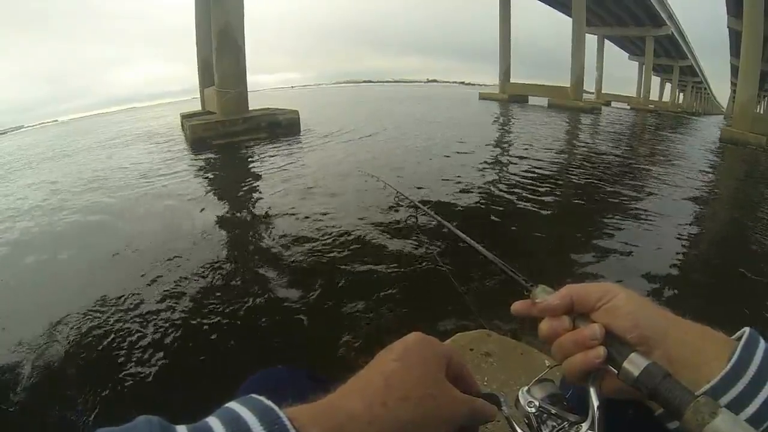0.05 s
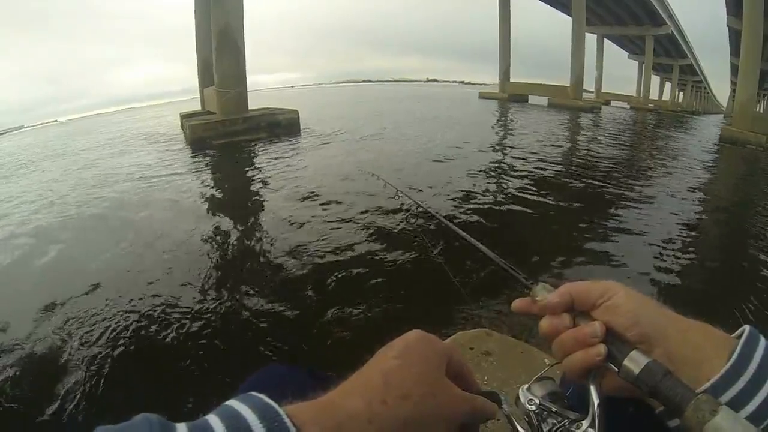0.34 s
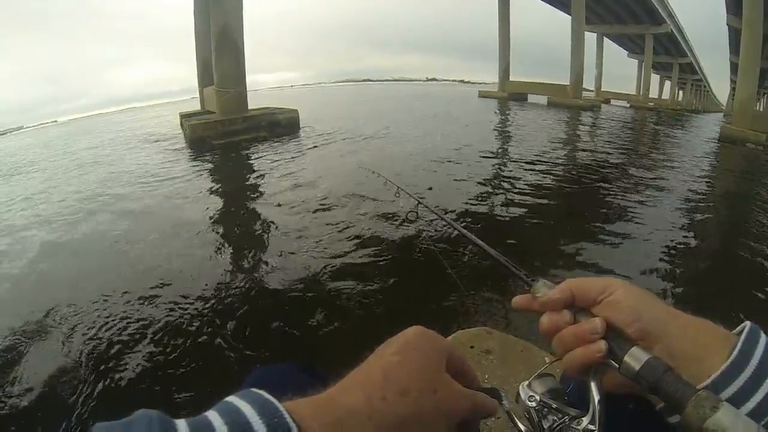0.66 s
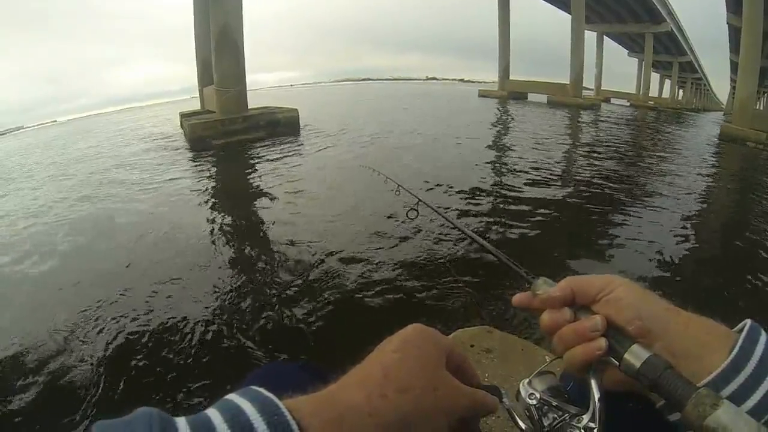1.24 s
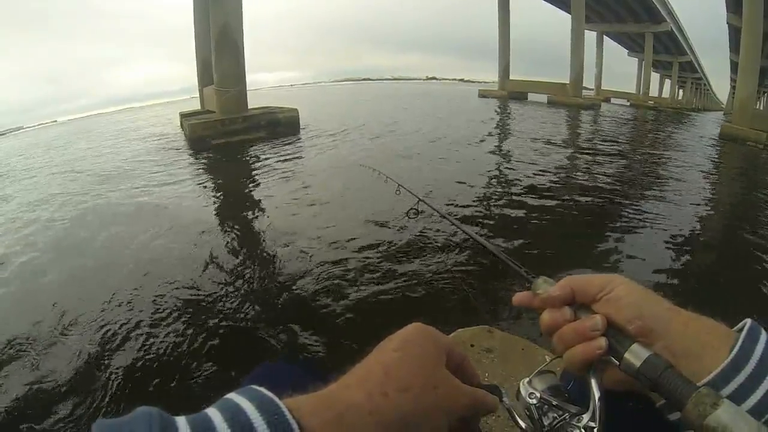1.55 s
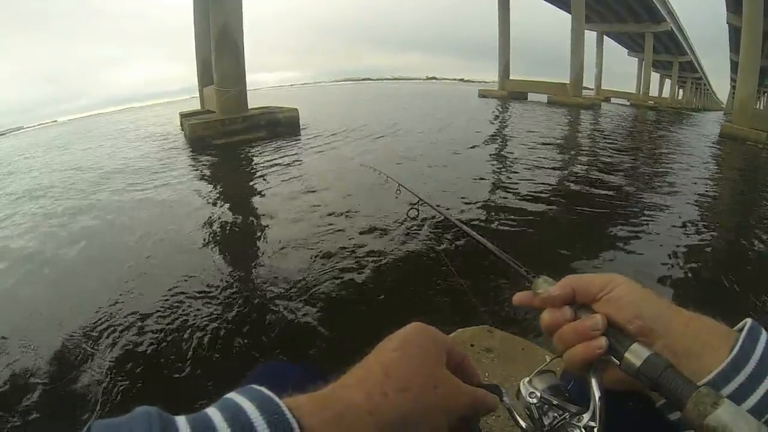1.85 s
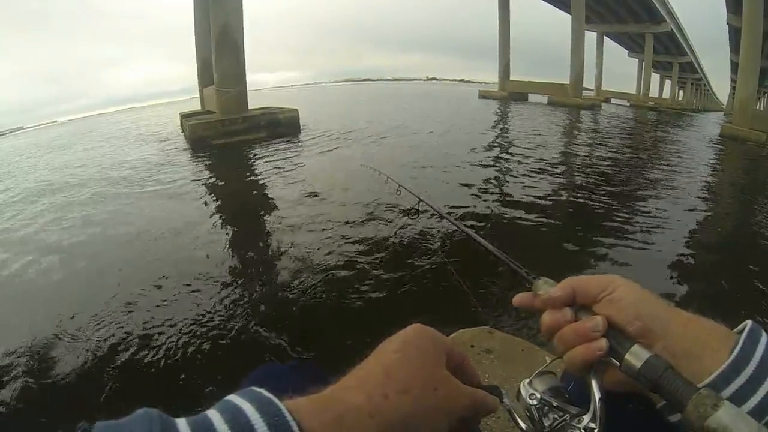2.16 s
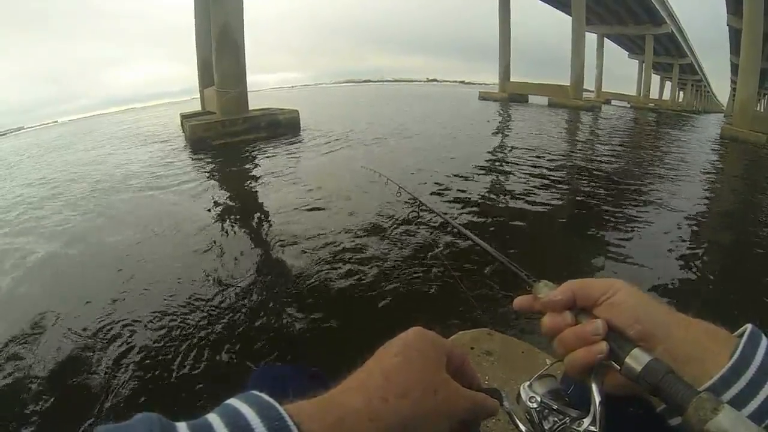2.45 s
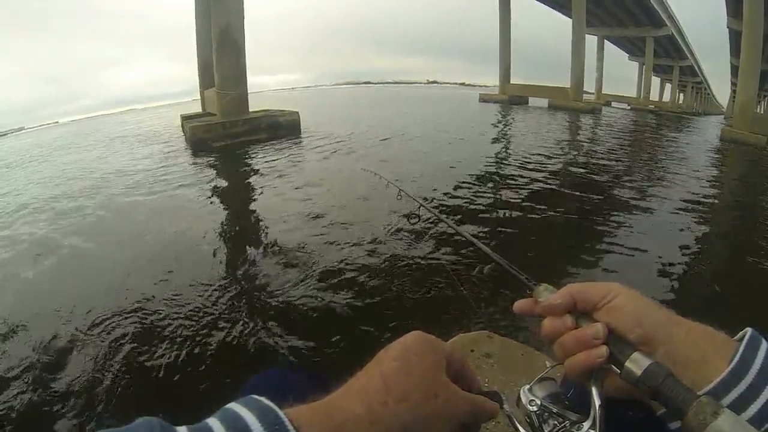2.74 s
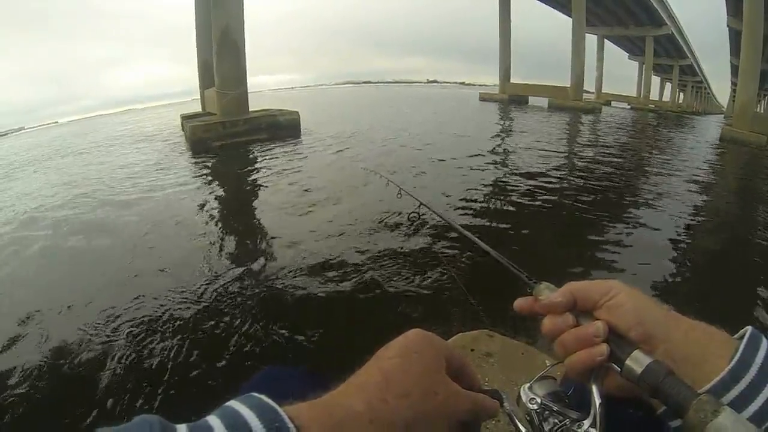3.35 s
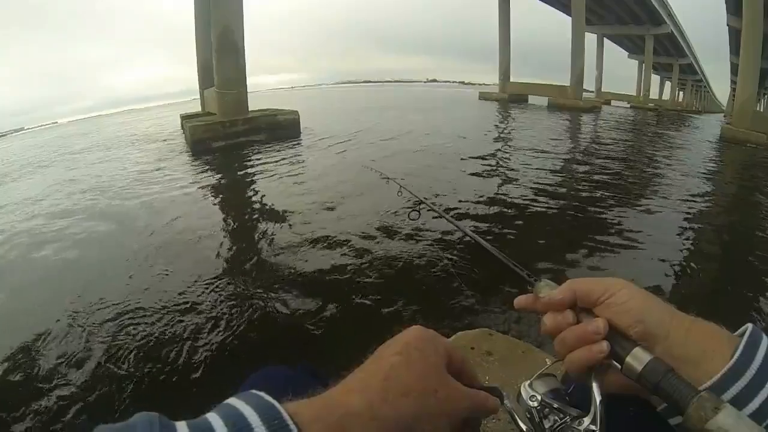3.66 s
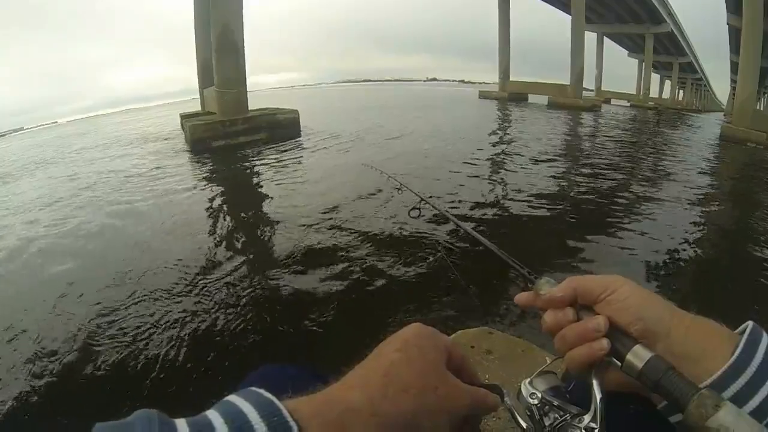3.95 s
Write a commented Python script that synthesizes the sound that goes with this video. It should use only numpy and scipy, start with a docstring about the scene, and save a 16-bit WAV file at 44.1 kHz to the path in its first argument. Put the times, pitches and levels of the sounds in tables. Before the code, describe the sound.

Steady traffic roar from a high bridge over water, with light wind rumble.

```python
"""Tyre roar and a receding heavy vehicle's drone, heard from open water under a high road bridge.
Wheels shake the deck overhead; light wind rumbles on the microphone.
Ripples hiss and wash softly, tiny bubbles burst, and an angler's reel ticks a few times.
The electronics of a body-worn camera add a very faint pulsing whine."""
import sys
import numpy as np
from scipy import signal
from scipy.io import wavfile

SR = 44100
rng = np.random.default_rng(int(sys.argv[2]) if len(sys.argv) > 2 else 0)


def int16_out(signal):
    """Quantize to a 16-bit WAV file."""
    q = np.round(np.clip(np.atleast_2d(signal).T, -1, 1) * 32767)
    wavfile.write(sys.argv[1], SR, q.astype(np.int16))


N = 176400
TIME_S = np.arange(N) / SR
CUTOFF_HZ = 14200


def from_db(db):
    """Decibels to gain."""
    return 10 ** (np.asarray(db) / 20)


def unit_rms(x):
    """Scale to rms 1."""
    return x / np.sqrt(np.mean(x ** 2) + 1e-20)


def in_time(rows):
    """Interpolate (time [s], values...) rows to every sample."""
    times_s, *columns = np.transpose(rows)
    return [np.interp(TIME_S, times_s, column) for column in columns]


def drift(rate_hz):
    """Smooth random wander, rms about 1."""
    hop, settle = 40, 2000
    pole = np.exp(-2 * np.pi * rate_hz * hop / SR)
    white = rng.standard_normal(N // hop + settle + 2)
    slow = signal.lfilter([1], [1, -2 * pole, pole * pole], white)[settle:]
    return np.interp(np.arange(N) / hop, np.arange(len(slow)), unit_rms(slow))


def butter(x, hz, kind, order=2):
    """Butterworth filter."""
    return signal.sosfilt(signal.butter(order, hz, kind, fs=SR, output="sos"), x)


def resonance(x, hz, width_hz):
    """Two-pole band-pass."""
    r = np.exp(-np.pi * width_hz / SR)
    return signal.lfilter([1, 0, -1], [1, -2 * r * np.cos(2 * np.pi * hz / SR), r * r], x)


def ring(clicks, hz, t60_s):
    """Damped mode: a unit click starts a sine of height 1."""
    r = from_db(-60 / (t60_s * SR))
    w = 2 * np.pi * hz / SR
    return signal.lfilter([0, np.sin(w)], [1, -2 * r * np.cos(w), r * r], clicks + 1e-18)


def banded_noise(spectrum, low_hz, high_hz, flicker_db, bands):
    """Noise in log-spaced bands, each flickering on its own; rms 1."""
    hz, db = np.transpose(spectrum)
    edges_hz = np.geomspace(low_hz, high_hz, bands + 1)
    white = rng.standard_normal((2, N + SR))
    out = 0
    for k, band_hz in enumerate(zip(edges_hz, edges_hz[1:])):
        level_db = np.interp(np.mean(np.log(band_hz)), np.log(hz), db) + flicker_db * drift(rate_hz=7)
        out += from_db(level_db) * butter(white[k % 2], band_hz, "band", order=3)[SR:]
    return unit_rms(out)


def pops(per_s, spread_db, max_db):
    """Impulses of random time, size and sign."""
    size_db = np.minimum(rng.exponential(spread_db, N), max_db)
    signs = rng.choice([-1, 1], N)
    return from_db(size_db) * signs * (rng.random(N) < per_s / SR)


def whine():
    """Thin electronic tones, gated in slightly uneven bursts."""
    # tones: (frequency [Hz], rms while on [dB])
    tones = [(6440, -75.5), (12890, -83.5)]
    pulse_hz, duty, jitter_cycles, wander_hz = 48.2, .45, .09, 35
    cycles = pulse_hz * TIME_S + jitter_cycles * drift(rate_hz=20)
    gate = butter(1.0 * (cycles % 1 < duty), hz=440, kind="low")
    out = 0
    for hz, db in tones:
        phase = 2 * np.pi * np.cumsum(hz + wander_hz * drift(rate_hz=40)) / SR
        out += np.sqrt(2) * from_db(db) * np.sin(phase)
    return gate * out


def crackle():
    """Tiny bubbles burst close by."""
    bursts = pops(per_s=110, spread_db=3, max_db=9)
    return from_db(-87) * unit_rms(butter(bursts + 1e-18, hz=(5000, 12000), kind="band"))


def ripples():
    """Countless far ripples merge into a faint, gently swelling hiss."""
    # hiss spectrum: (frequency [Hz], relative density [dB])
    spectrum = [(2600, -2), (2950, -2), (3500, 0), (3950, -5.5), (4550, -12.5), (5400, -15), (7000, -24),
                (8000, -18), (8700, -26.5), (9500, -21.5), (11000, -29.5), (12300, -27), (14000, -34)]
    # hiss swell: (time [s], gain [dB])
    swell = [(0, 0), (.85, -0.5), (1.3, 0.8), (2.1, 1), (2.55, 0.5), (3.0, -1.4), (3.4, 0.5), (3.7, -1.5),
             (4, .5)]
    swell_db, = in_time(swell)
    hiss = banded_noise(spectrum, low_hz=2647, high_hz=CUTOFF_HZ, flicker_db=.8, bands=14)
    return from_db(-61.5 + swell_db) * hiss


def washes():
    """Each wash is a swell of tiny droplets fizzing around one pitch."""
    # Gaussian swells: (peak time [s], sigma [s], peak rms [dB], centre [Hz])
    swells = [(.41, .042, -64, 3800), (.5, .06, -67.5, 5000), (1.308, .04, -54, 2450),
              (1.388, .048, -65, 4400), (2.25, .2, -71, 5000), (2.575, .018, -69, 5700),
              (3.92, .06, -67, 5700)]
    out = 0
    for peak_s, sigma_s, db, hz in swells:
        droplets = pops(per_s=2500, spread_db=3.6, max_db=14.4)
        fizz = butter(resonance(droplets, hz, width_hz=.45 * hz), 1.5 * hz, "low")
        envelope = np.exp(-.5 * ((TIME_S - peak_s) / sigma_s) ** 2)
        out += from_db(db) * envelope * unit_rms(fizz)
    return out


def plip():
    """One small bubble rings briefly at the waterline."""
    peak_s, sigma_s, pitch_hz = 3.155, .008, 2000
    offset_s = TIME_S - peak_s
    envelope = np.exp(-.5 * (offset_s / sigma_s) ** 2)
    return from_db(-44) * envelope * np.sin(2 * np.pi * pitch_hz * offset_s)


def reel():
    """Reel and line tick: dry cracks, the harder ones ringing the reel's modes."""
    # ticks: (time [s], strength [dB], crack low edge [Hz], crack high edge [Hz], ring gain [dB])
    ticks = [(1.081, -49, 3200, 5800, -14), (1.381, -48, 4800, 8000, -10), (1.387, -47, 3600, 7000, -10),
             (1.396, -49, 3400, 6000, -14), (2.291, -50, 4000, 6400, -10),
             (2.5205, -50.5, 7000, 10600, -20), (2.8717, -46, 9600, 11200, -5),
             (2.875, -51, 4800, 7400, -10), (2.8815, -55, 9800, 11400, -15), (2.9295, -43, 3700, 11000, 0),
             (2.9335, -49, 4200, 8400, -6), (2.9465, -52, 7700, 8700, -10), (3.859, -56, 8500, 12500, -15),
             (3.885, -54, 4800, 11500, -12)]
    # reel modes: (frequency [Hz], gain [dB], t60 [s])
    modes = [(4240, -5, .02), (4800, -13, .008), (6280, -10, .02), (7800, -19, .01), (10350, -11, .008),
             (10950, -15, .007)]
    scuff_decay_s, scuff_gain_db = .0015, -2.5
    knocks, cracks = np.zeros(N), 0
    for start_s, db, low_hz, high_hz, ring_db in ticks:
        age_s = TIME_S - start_s
        envelope = (age_s >= 0) * np.exp(-np.minimum(np.abs(age_s) / scuff_decay_s, 20))
        scuff = envelope * rng.standard_normal(N)
        cracks += from_db(db + scuff_gain_db) * butter(scuff, [low_hz, high_hz], "band", order=3)
        knocks[int(start_s * SR)] = from_db(db + ring_db)
    ringing = sum(from_db(db) * ring(knocks, hz, t60_s) for hz, db, t60_s in modes)
    return butter(cracks + ringing, hz=11400, kind="low", order=8)


def wind():
    """Gusts on the microphone make a lumpy low rumble."""
    # gusts: (time [s], rms [dB])
    gusts = [(0, -38.5), (.6, -32), (1.35, -33.5), (1.7, -38), (2.5, -33.5), (2.95, -44.5), (3.55, -27),
             (3.75, -36.5), (3.87, -29.5), (4, -41)]
    # rumble spectrum: (frequency [Hz], relative density [dB])
    spectrum = [(12, -7), (27, 1.5), (44, -5), (62, -3), (80, -1.5), (130, -11), (300, -42.5), (900, -84.5)]
    gust_db, = in_time(gusts)
    return from_db(gust_db) * banded_noise(spectrum, low_hz=11.73, high_hz=748, flicker_db=1.5, bands=9)


def deck():
    """Wheels shake the bridge's low resonances; each swells on its own."""
    # deck resonances: (centre [Hz], width [Hz], rms [dB])
    modes = [(59.7, 57, -40.5), (112.8, 12, -44), (173.5, 17.8, -42.5), (288, 121, -38)]
    swell_db = 1.5
    out = 0
    for hz, width_hz, db in modes:
        shake = butter(rng.standard_normal(N + SR), [hz - width_hz / 2, hz + width_hz / 2], "band")[SR:]
        out += from_db(db + swell_db * drift(rate_hz=2.6)) * unit_rms(shake)
    return out


def engines():
    """Only the firing tones carry from afar; they sink in pitch and fade, roughened by echoes."""
    # exhaust note of the receding vehicle: (time [s], pitch [Hz], rms [dB])
    exhaust = [(0, 101.8, -23.5), (.13, 101.9, -24), (.21, 101.5, -27.5), (.28, 101.5, -24),
               (.34, 101, -30), (.49, 98.8, -27.5), (.59, 100.4, -26.5), (.7, 98.4, -43.5), (.77, 97, -48),
               (.82, 96.8, -34.5), (.91, 96.85, -39.5), (1.0, 96.2, -32), (1.07, 97, -37),
               (1.12, 96.6, -33), (1.165, 94.1, -44), (1.21, 94.7, -31), (1.29, 94.4, -32), (1.36, 95, -46),
               (1.43, 93.6, -28.5), (1.49, 93.3, -32), (1.57, 93.55, -41.5), (4, 88.1, -69)]
    # higher engine drone: (time [s], pitch [Hz], rms [dB])
    drone = [(0, 194, -42.5), (.6, 189.6, -39), (1.25, 192.6, -43), (1.44, 188.5, -34), (1.53, 186.4, -42),
             (1.62, 185.2, -33), (1.87, 181.8, -35), (1.96, 183, -39.5), (2.06, 183.4, -30),
             (2.17, 182.5, -34), (2.3, 179, -46), (4, 180.2, -71)]
    wobble, flutter_db, echo_gain, echo_rate_hz = .012, .1, .22, 25
    out = 0
    for curve in (exhaust, drone):
        hz, db = in_time(curve)
        phase = 2 * np.pi * np.cumsum(hz * (1 + wobble * drift(rate_hz=6.1))) / SR
        echoes = drift(echo_rate_hz) * np.sin(phase) + drift(echo_rate_hz) * np.cos(phase)
        amplitude = np.sqrt(2) * from_db(db + flutter_db * drift(rate_hz=7.5))
        out += amplitude * (np.sin(phase) + echo_gain * echoes)
    return out


def tyres():
    """Many tyres merge into a roar, dulled by distance above about 900 Hz."""
    # roar spectrum: (frequency [Hz], relative density [dB])
    spectrum = [(130, -3), (185, 2), (220, -2), (280, -1), (340, -10), (400, -6.5), (620, -6), (750, -3),
                (900, -2), (1030, -7), (1270, -19), (1600, -19.5), (1950, -24.5), (2250, -33.5),
                (2600, -34)]
    # traffic flow: (time [s], gain [dB])
    flow = [(0, 1), (.55, 1.16), (.9, -0.26), (1.4, 1.3), (1.6, -0.3), (2.0, 2), (2.6, 0.87), (3.4, 0.66),
            (4, 0)]
    flow_db, = in_time(flow)
    roar = banded_noise(spectrum, low_hz=102.55, high_hz=2672, flicker_db=.56, bands=30)
    return from_db(-30.5 + flow_db) * roar


def scene():
    """Bridge, wind, water, reel and whine, summed to mono."""
    bridge = tyres() + deck() + engines()
    return (bridge + wind() + ripples() + washes() + crackle() + plip() + reel() + whine())[None]


def record(dry):
    """Steep elliptic low-pass."""
    return signal.sosfilt(signal.ellip(10, .1, 80, CUTOFF_HZ, fs=SR, output="sos"), dry)


dry = scene()
out = record(dry)
int16_out(out)
```